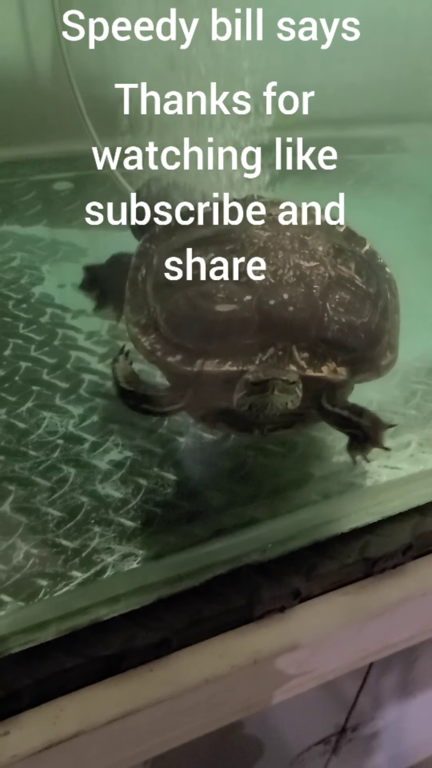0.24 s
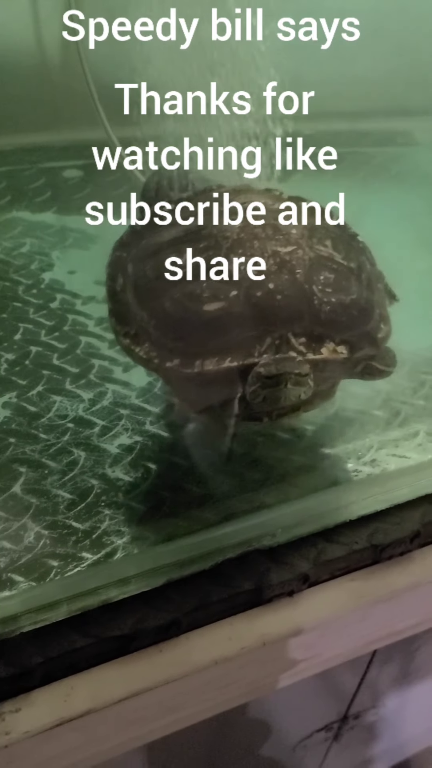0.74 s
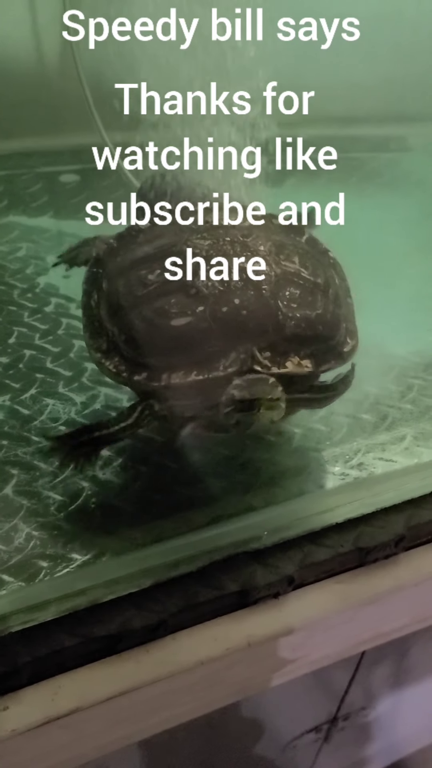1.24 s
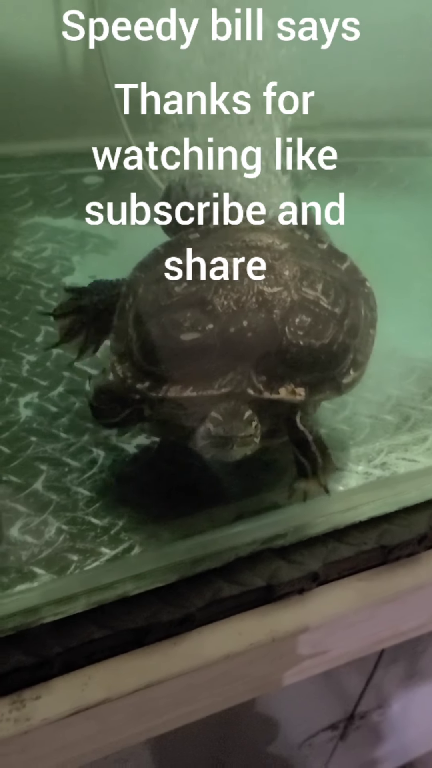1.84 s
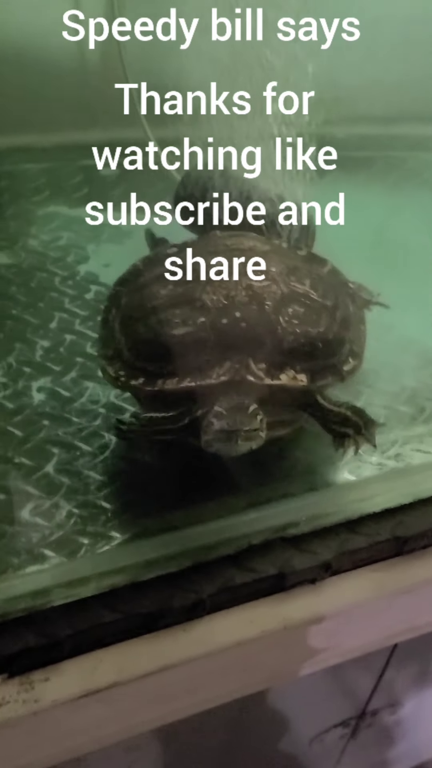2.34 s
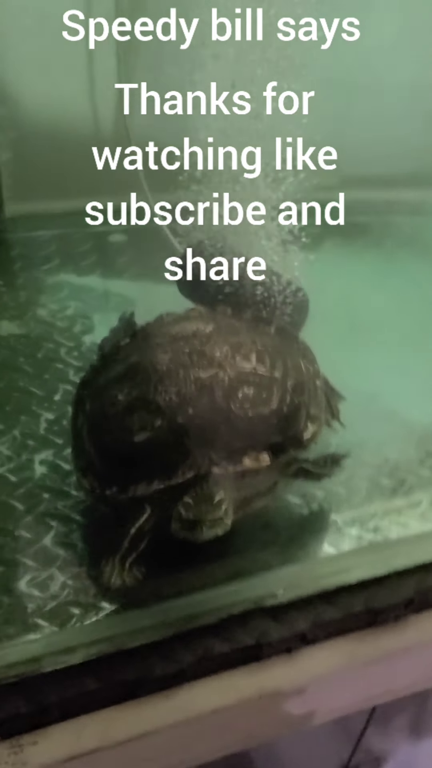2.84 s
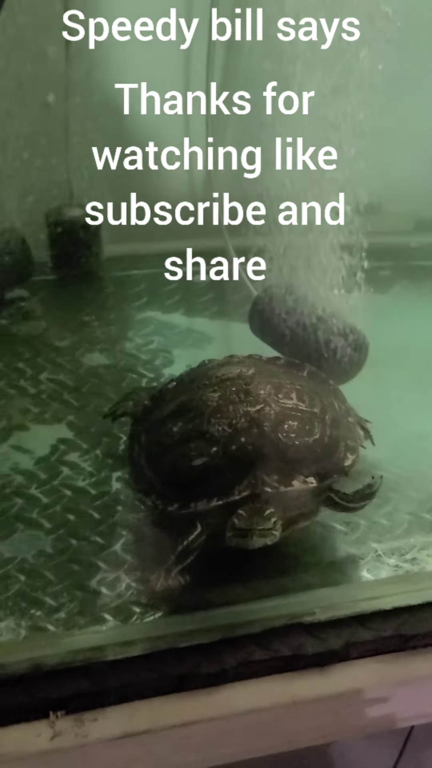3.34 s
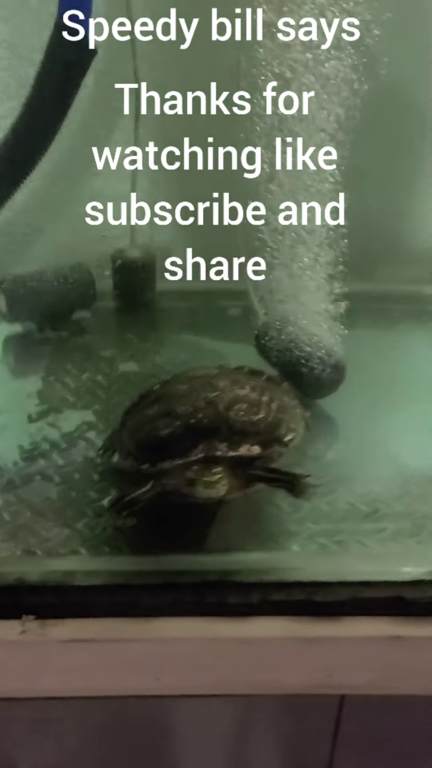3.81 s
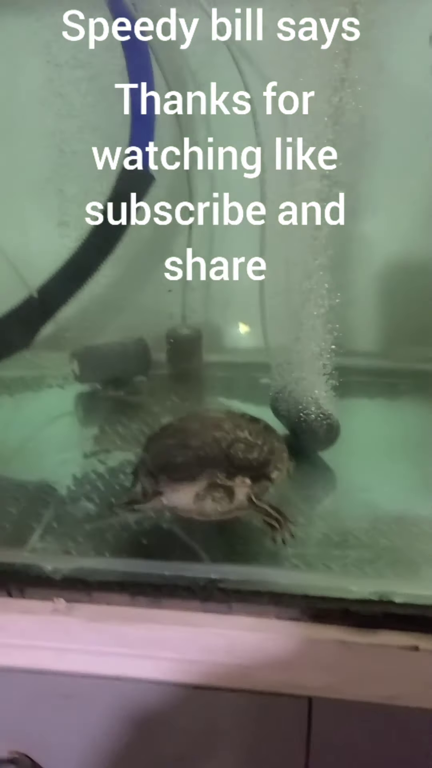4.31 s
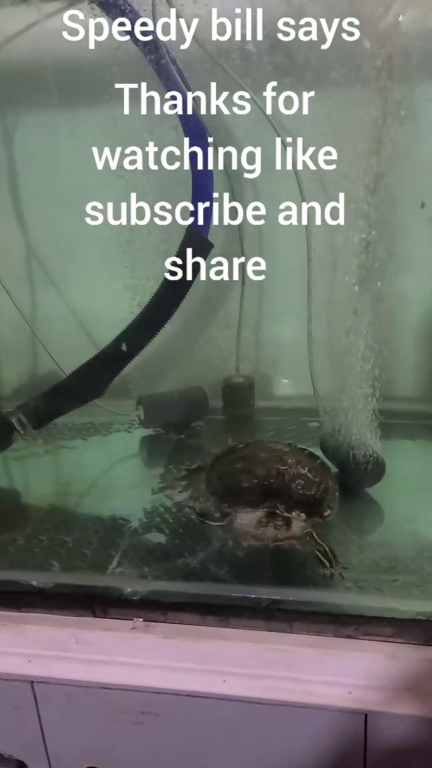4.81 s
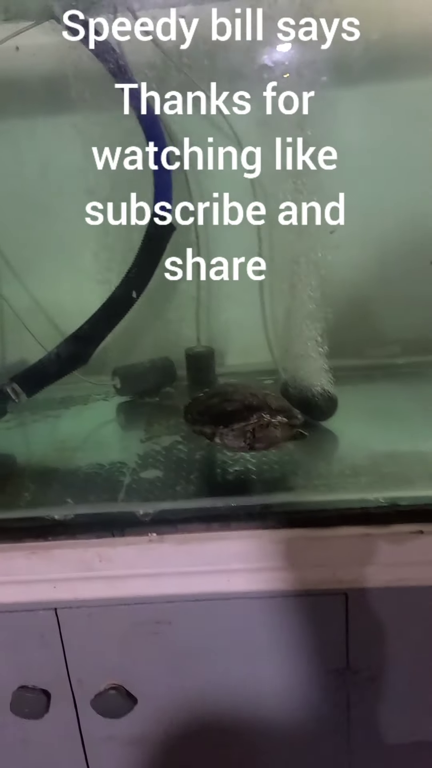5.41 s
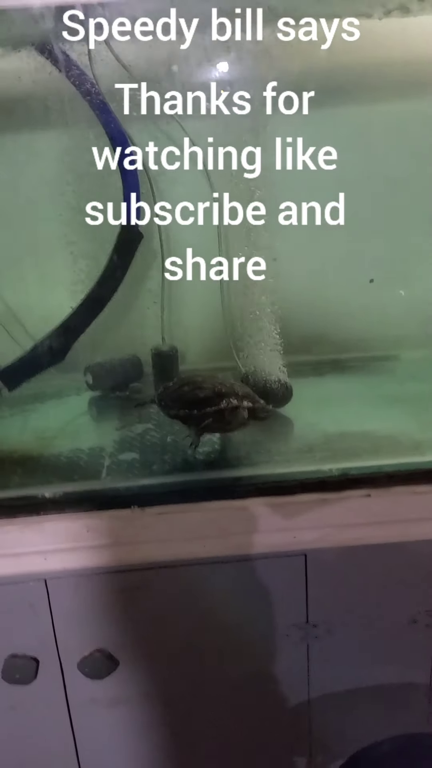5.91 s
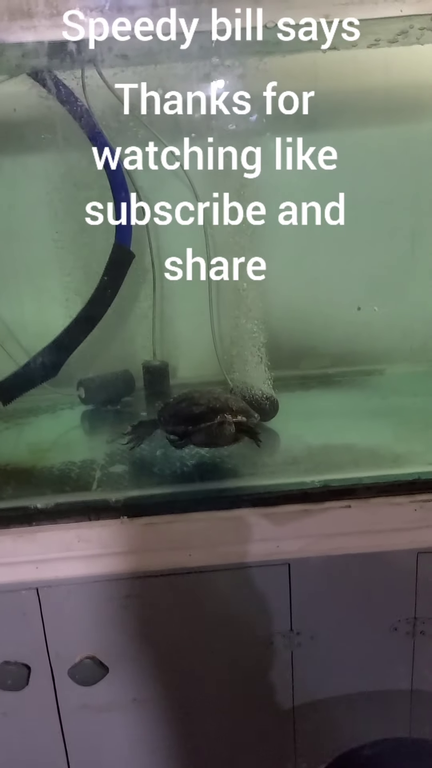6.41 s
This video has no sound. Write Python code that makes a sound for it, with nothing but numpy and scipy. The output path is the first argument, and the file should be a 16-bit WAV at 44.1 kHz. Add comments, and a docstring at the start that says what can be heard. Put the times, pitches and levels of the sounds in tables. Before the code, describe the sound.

An aquarium air pump gives a steady low hum and buzz in a small room. Over it, an air stone fizzes continuously, its bubbles churning the water with tiny tinkles and faint spatters. About halfway through there is a light click to the right. The microphone, close to the glass at first, then backs away and the hum thins. A soft handling bump and a faint hollow knock on the cabinet follow.

```python
"""Aquarium in a small room.

A diaphragm air pump hums at mains rate; the air stone fizzes, its bubbles churning the water and
bursting under the lid, with tinkling spurts and faint spatters. The microphone starts close to the
glass and backs off two steps from about the middle: the hum thins and the fizz changes colour.
In passing, a light click to the right, a soft handling bump and a hollow knock on the cabinet."""
import sys
import numpy as np
from scipy import signal
from scipy.fft import rfft, irfft, next_fast_len
from scipy.io import wavfile
from scipy.ndimage import map_coordinates

SR = 44100
rng = np.random.default_rng(int(sys.argv[2]) if len(sys.argv) > 2 else 0)


def wrap_up_sound(samples):
    """Save the sound to the file named by the first command line argument, as 16-bit audio."""
    columns = np.atleast_2d(samples).T
    # keep every value between -1 and 1, then stretch to whole-number steps
    tamed = np.clip(columns, -1, 1)
    steps = np.round(tamed * 32767).astype(np.int16)
    wavfile.write(sys.argv[1], SR, steps)


N = 293485
TIME = np.arange(N) / SR
SIDES = np.array([[.5], [-.5]])  # splits a left-minus-right difference between the channels
PORT_DELAY_S = .00045  # sound's travel time from the microphone's left port to its right
MAINS_HZ, TOP_HZ = 60.03, 15800

# The microphone's path. Each row: time in seconds, steps back from the glass.
MIC_PATH = [(3.2, 0), (3.7, 0.3), (4.2, 1.1), (4.8, 1.17), (5.5, 1.67), (6.1, 2), (6.65, 2)]
# The hum's octave, a standing wave that dwindles towards a node back in the room.
# Each row: left level in dB, right level in dB; at the glass, one step back, two steps back.
HUM_OCTAVE = [(-39, -38.5), (-44.5, -43), (-60, -53.5)]
# The pump housing's buzz. Each row: multiple of the stroke rate, left and right level in dB
# at the glass, the same pair one step back, the same two steps back, left phase lead in radians.
HOUSING_BUZZ = [(2.5, -57.5, -55.5, -58, -57, -64, -58, 0), (3, -64, -62, -57, -55, -57, -56.5, 0),
                (3.5, -60.5, -63, -63, -61, -69, -70, -0.092),
                (4, -58.5, -56.5, -72, -69, -56, -59, -0.098), (5, -60, -58.5, -62.5, -55.5, -73, -60, .2),
                (6, -54.5, -58, -52.5, -56, -53, -47.5, -1.8), (7, -52.5, -53.5, -72, -59, -65, -59, -0.4),
                (8, -64, -55, -55, -59, -66, -72, 2.2), (9, -69, -57.5, -62, -59, -71, -59.5, 1.15),
                (10, -74, -57, -67, -66, -73, -64, -.3), (11, -60, -63, -63, -70, -56.5, -59, 0.85),
                (12, -60, -56, -57, -74, -63, -64, 1.3), (13, -77, -63, -66, -68, -70, -58, -0.72),
                (14, -59.5, -62.5, -71, -62, -72, -63, 1.63), (15, -66, -68, -67, -78, -73, -79, 0.47)]
# Spectra of churn and fizz, at the glass and a step back.
# Each row: frequency in Hz, relative level in dB.
CHURN_AT_GLASS = [(15, -3), (40, -1), (85, 4), (190, -1.1), (300, -1.6), (450, -2), (720, -4), (1050, -7),
                  (1450, -6), (1900, -8), (2300, -17), (3500, -30.5), (8000, -28)]
CHURN_STEP_BACK = [(15, -10), (40, -1), (85, 7), (190, -5.5), (300, -2.5), (450, -2), (720, -2), (1100, -7),
                   (1450, -6.5), (1900, -10), (2300, -16), (3500, -22.5), (8000, -29)]
FIZZ_AT_GLASS = [(1200, -15), (2700, 2), (3700, 0), (4400, -1), (6100, -0.5), (7000, 1), (8200, -1.5),
                 (8700, -6.5), (9900, -5.5), (11300, -1.5), (12200, 3), (14000, 4), (15800, 1.5)]
FIZZ_STEP_BACK = [(1200, -18), (2700, 1.5), (3700, 0), (4400, -1), (6100, 0.5), (7000, .5), (8200, -2.5),
                  (8700, -7.5), (9900, -6), (11300, -2.5), (12200, 1.5), (14000, 2.5), (15800, -0.5)]
# Resonances above the water, rung by bursting bubbles. Each row: pitch in Hz, width in Hz,
# relative level in dB at the glass, the same a step back, dip in dB during the lull.
LID_RESONANCES = [(1402, 150, -4, -1.5, 0), (2530, 105, -3, -2, 6), (2850, 146, -2.8, -2.5, 3),
                  (4370, 140, -13, -7.5, 0), (5313, 88, -3.5, -3.5, 2), (5380, 340, -2.5, -1.5, 7),
                  (6670, 400, -9, -18, 2), (8230, 380, -14, -5, -4)]
# Runs of like-sized bubbles. Each row: start in seconds, level in dB, pitch in Hz, length in seconds.
BUBBLE_RUNS = [(0.1, -58.5, 5400, 0.15), (0.998, -56, 5420, .07), (1.126, -57, 5370, 0.14),
               (2.19, -60, 5320, 0.046), (2.328, -51, 5360, 0.039), (2.35, -55, 2500, 0.06),
               (2.58, -58, 5460, 0.056), (2.703, -54, 5295, .05), (3.28, -61, 2810, 0.22),
               (3.568, -51, 5335, 0.022), (3.947, -54, 5320, 0.057), (4.07, -53, 5480, 0.05),
               (4.38, -57, 2564, 0.2), (4.456, -54, 5340, .05), (4.64, -54, 5370, .05),
               (4.69, -59, 2830, .07), (4.882, -56, 2524, .14), (5.05, -54, 2590, 0.07),
               (5.197, -61, 5290, .14), (5.368, -54.5, 5400, .11), (5.33, -64, 2860, 0.12),
               (5.768, -52, 2570, 0.09), (5.896, -56, 2547, 0.15), (6.029, -53, 5460, 0.073),
               (6.187, -54, 5250, 0.076), (6.33, -57, 2560, 0.11), (6.516, -58, 2550, 0.1)]
# Bubbles bursting together.
# Each row: peak time in seconds, level in dB, centre in Hz, width in Hz, half-length in seconds.
FOAM_BURSTS = [(1.144, -51, 13000, 4000, .03), (1.87, -52, 7000, 3000, .015),
               (2.055, -49, 12500, 4000, 0.016), (2.39, -50, 13500, 4000, .012),
               (4.0, -50, 13500, 3000, .04), (5.882, -47, 5500, 5000, 0.03), (6.435, -51, 8300, 2500, .025)]
# Quick contacts of a small hard object. Each row: start in seconds, relative force in dB.
CLICK_CONTACTS = [(2.9128, -32), (2.917, -30.5), (2.927, -41), (2.938, -39)]
# That object's ring. Each row: pitch in Hz, width in Hz, gain in dB.
OBJECT_MODES = [(910, 270, 5), (1430, 240, 5.5), (2430, 400, -1), (3160, 350, -4), (4500, 600, -5.5),
                (5670, 590, -1), (6830, 350, 6), (7900, 450, -7.5), (9900, 1400, -11.5), (11800, 730, 0.5),
                (13400, 650, -2), (14500, 1000, -5)]
# Soft blows on the hand-held case. Each row: peak time in seconds, peak level in dB, pitch in Hz,
# half-length in seconds, left minus right in dB.
CASE_BLOWS = [(4.452, -32.5, 38, 0.035, -18), (4.49, -31, 65, 0.018, 11), (4.541, -35, 65.5, 0.014, 16),
              (4.593, -38, 50, 0.019, -12)]
# Nudges on the cabinet. Each row: time in seconds, relative force in dB, scuff half-length in seconds.
CABINET_NUDGES = [(4.785, -15, .01), (4.807, -15.5, .02), (4.879, -25, 0.022)]
# The hollow cabinet's ring. Each row: pitch in Hz, width in Hz, gain in dB.
CABINET_MODES = [(365, 32, 0.5), (535, 100, -11), (690, 120, -14)]
# The tank's direct sound. Each row: frequency in Hz, share arriving straight from the left.
DIRECT_SHARE = [(300, 0.59), (1000, 0.22), (3200, 0.17), (6000, 0.027), (15000, .04)]
# Shading between the two ports. Each row: frequency in Hz, left minus right in dB.
PORT_SHADING = [(500, 0.5), (1100, 1.5), (3000, 0), (4800, -2.5), (6200, -3), (7200, -5.5), (8100, 7.5),
                (8900, -6), (10000, -5), (12000, -5.5), (13800, -7), (15500, 8)]


def amp(db):
    """Decibels to gain."""
    return 10 ** (np.asarray(db) / 20)


def unit(x):
    """Scale to rms 1."""
    return x / np.sqrt(np.mean(x ** 2) + 1e-20)


def along(points, hz):
    """Read (Hz, value) points on a log frequency axis."""
    freqs, values = np.transpose(points)
    return np.interp(np.log(hz + 1), np.log(freqs + 1), values)


def wobble(rate):
    """A smooth random curve, rate knots a second."""
    knots = rng.standard_normal(512)
    coarse = TIME[::64]
    return np.interp(TIME, coarse, map_coordinates(knots, [coarse * rate + 2], mode="wrap"))


def swell(at, half_length):
    """A bell-shaped envelope, timed in seconds."""
    return np.exp(-2 * np.minimum(((TIME - at) / half_length) ** 2, 20))


def filtered(x, response):
    """Pass x through a complex frequency response."""
    size = next_fast_len(N + SR // 10, real=True)
    gain = response(np.fft.rfftfreq(size, 1 / SR)).astype(np.complex64)
    return irfft(rfft(x.astype(np.float32), size) * gain, size)[..., :N]


def coloured(x, spectrum):
    """Shape x by (Hz, dB) points, at rms 1."""
    return unit(filtered(x, lambda f: amp(along(spectrum, f))))


def resonance(f, hz, width):
    """Causal response of one mode."""
    return 1j * f * width / (hz * hz - f * f + 1j * f * width)


def steep_resonance(f, hz, width):
    """A mode in two stages, keeping the valleys between modes dark."""
    return resonance(f, hz, width) * resonance(f, hz, 4 * width)


def steps_back():
    """The microphone's distance from the glass at each sample."""
    return np.interp(TIME, *np.transpose(MIC_PATH))


def backing_away(*stops):
    """Blend between what is heard at the glass and after each step back."""
    steps = np.clip(steps_back(), 0, len(stops) - 1)
    return sum(stop * np.maximum(1 - abs(steps - k), 0) for k, stop in enumerate(stops))


def diffuse_likeness(hz):
    """How alike the two ports hear sound that comes from all sides."""
    return np.sinc(2 * hz * PORT_DELAY_S)


def room(x, t60, wet_db):
    """The small room gives each burst a short diffuse tail: noise carrying its dying energy."""
    decay = amp(-60 / (t60 * SR)) ** 2
    energy = signal.lfilter([1 - decay], [1, -decay], x ** 2)
    return x + amp(wet_db) * np.sqrt(energy + 1e-20) * rng.standard_normal((2, N))


def pump():
    """The diaphragm hums at mains rate; its housing buzzes into the room's standing waves."""
    stroke = 2 * np.pi * MAINS_HZ * TIME
    steps = steps_back()
    hum_db = -35 - 2 * np.maximum(steps - 1, 0)  # holds for the first step back, then fades
    fundamental = amp(hum_db + 0.69 * SIDES) * np.sin(stroke - 0.12 * SIDES)
    skew = SIDES * backing_away(0, 0.1, 1.5)  # near its node the octave reaches the ports out of step
    octave = amp(backing_away(*np.array(HUM_OCTAVE)[..., None])) * np.sin(2 * stroke + skew)
    buzz = np.zeros((2, N))
    waver_db = .4 + .35 * steps
    for multiple, *stops_db, lead in HOUSING_BUZZ:
        level_db = backing_away(*np.reshape(stops_db, (-1, 2, 1))) + waver_db * wobble(7)
        phase = multiple * stroke + rng.uniform(0, 2 * np.pi)
        # shorter waves differ more between the ports as the microphone drifts
        drift = 0.22 * np.arccos(diffuse_likeness(multiple * MAINS_HZ)) * wobble(0.49)
        buzz += amp(level_db) * np.sin(phase + SIDES * (lead + drift))
    return np.sqrt(2) * (amp(-0.5) * buzz - fundamental - octave)


def pops(rate, spread_db):
    """Bubbles burst at random, rate a second, many small and few large."""
    bursts = np.zeros((2, N))
    moments = rng.random((2, N)) < rate / SR
    size = np.clip(rng.standard_normal(N // 2), -3, 2.5)
    strengths = amp(spread_db * size) * rng.choice([-1, 1], len(size))
    bursts[moments] = np.resize(strengths, moments.sum())
    return unit(bursts)


def churn():
    """Rising air stirs the surface: a low wash with small gurgles, a little weaker further off."""
    water = rng.standard_normal((2, N)) + amp(-4) * pops(rate=260, spread_db=2)
    wash = backing_away(coloured(water, CHURN_AT_GLASS), coloured(water, CHURN_STEP_BACK))
    level_db = -44.5 - 0.6 * steps_back() + 0.48 * wobble(9.5)
    return amp(level_db) * wash


def wandering(x, depth=.0045, rate=7):
    """The pitch drifts a little as bubble sizes change from moment to moment."""
    position = np.cumsum(1 + depth * wobble(rate)) % (N - 1)
    return np.array([np.interp(position, np.arange(N), side) for side in x])


def air_stone():
    """Thousands of tiny bubbles burst each second; some ring narrow resonances under the lid."""
    spray = room(pops(rate=2800, spread_db=5), t60=0.14, wet_db=2.5)
    flicker = amp(2.5 + 0.051 * wobble(20))
    fizz = flicker * backing_away(coloured(spray, FIZZ_AT_GLASS), coloured(spray, FIZZ_STEP_BACK))
    lull = swell(at=3.41, half_length=.2)  # the ringing dips as the microphone starts to move
    for hz, width, near_db, far_db, dip_db in LID_RESONANCES:
        bursts = room(pops(rate=220, spread_db=1.5), t60=0.14, wet_db=-1.5)
        ring = filtered(bursts, lambda f: steep_resonance(f, hz, width))
        ring = unit(wandering(ring))
        ring_db = backing_away(near_db, far_db) - 8.5 - dip_db * lull + 0.46 * wobble(18)
        fizz += amp(ring_db) * ring
    return amp(-49) * fizz


def spurts(bubbles=14, attack_s=0.0031, t60=0.12, scatter_hz=26.1):
    """Runs of like-sized bubbles tinkle: each rings briefly at nearly the same pitch."""
    out = np.zeros((2, N + SR))
    t = np.arange(SR // 3) / SR
    for start, db, hz, length in BUBBLE_RUNS:
        run = np.zeros((2, len(t)))
        for k in range(bubbles):
            onset = length * (k + rng.random()) / bubbles
            age = np.maximum(t - onset, 0)
            envelope = amp(rng.normal(0, 2.3) - 60 * age / t60) * (1 - np.exp(-age / attack_s))
            pitch = hz + scatter_hz * rng.standard_normal()
            run += envelope * np.sin(2 * np.pi * (pitch * age + rng.random((2, 1))))
        first = round(start * SR)
        out[:, first:first + len(t)] += amp(db) * unit(run) * np.sqrt(length / t[-1])
    return out[:, :N]


def spatters():
    """Now and then a raft of foam collapses at once."""
    foam = pops(rate=4000, spread_db=3)
    return sum(amp(db) * swell(at, half_length) * unit(filtered(foam, lambda f: resonance(f, hz, width)))
               for at, db, hz, width, half_length in FOAM_BURSTS)


def click(contact_t60=0.014):
    """Brief scraping contacts ring a small hard object to the right of the microphone."""
    force = sum(amp(db - 60 * np.maximum(TIME - start, 0) / contact_t60) * (TIME >= start)
                for start, db in CLICK_CONTACTS)
    contacts = room(force * rng.standard_normal((2, N)), t60=0.17, wet_db=-0.5)
    body = lambda f: sum(amp(db) * resonance(f, hz, width) for hz, width, db in OBJECT_MODES)
    return filtered(contacts, body) * amp([[5], [8]])


def handling_bumps():
    """Each soft blow on the hand-held case is a few swings of one low mode."""
    return sum(-amp(db + pan_db * SIDES) * swell(at, half_length) * np.cos(2 * np.pi * hz * (TIME - at))
               for at, db, hz, half_length, pan_db in CASE_BLOWS)


def cabinet_knock(push_s=.001):
    """Something soft nudges the hollow cabinet: a brief push and a faint scuff each time."""
    scuff = amp(-2) * rng.standard_normal((2, N))
    force = sum(amp(db) * (swell(at, push_s) + scuff * swell(at + scuff_s / 2, scuff_s))
                for at, db, scuff_s in CABINET_NUDGES)
    body = lambda f: sum(amp(db) * steep_resonance(f, hz, width) for hz, width, db in CABINET_MODES)
    return filtered(force, body)


def glass_walls(x, echo_db, width_hz, count):
    """Early echoes between the panes ripple the spectrum and make the water sound boxed in."""
    delays = rng.integers(SR // 250, SR // 40, (2, count))  # 4 to 25 ms
    echoes = np.array([sum(np.pad(side, (delay, 0))[:N] for delay in row)
                       for side, row in zip(x, delays)])
    return x + amp(echo_db) * filtered(echoes, lambda f: resonance(f, hz=1800, width=width_hz))


def at_microphone(pair):
    """Mix two unrelated signals as the ports hear the tank: mostly diffuse, partly from the left."""
    def likeness(f):
        share = np.clip(along(DIRECT_SHARE, f), 0, 1)
        return (1 - share) * diffuse_likeness(f) + share * np.exp(-2j * np.pi * f * PORT_DELAY_S)
    left, other = pair
    shared = filtered(left, likeness)
    unshared = filtered(other, lambda f: np.sqrt(abs(1 - abs(likeness(f)) ** 2)))
    return np.array([left, shared + unshared])


def scene():
    """Pump and handling bumps, with the tank and the click shaded differently at each port."""
    water = glass_walls(churn() + air_stone() + spatters(), echo_db=-14.5, width_hz=6300, count=8)
    tank = at_microphone(water + spurts() + cabinet_knock())
    shaded = filtered(tank + click(), lambda f: amp(SIDES * along(PORT_SHADING, f)))
    return pump() + handling_bumps() + shaded


def record(dry):
    """The recorder keeps nothing above its band limit."""
    return filtered(dry, lambda f: f < TOP_HZ)


dry = scene()
out = record(dry)
wrap_up_sound(out)
```